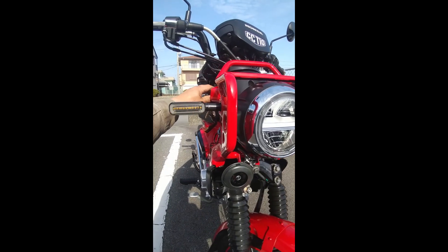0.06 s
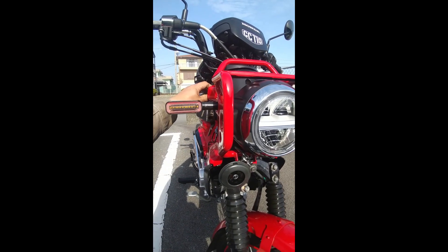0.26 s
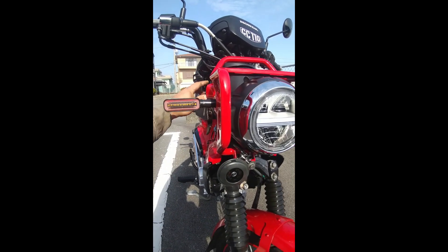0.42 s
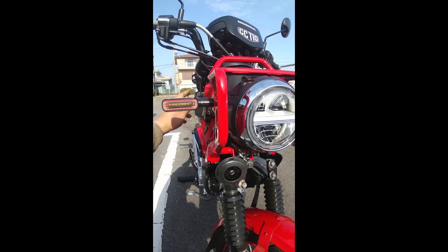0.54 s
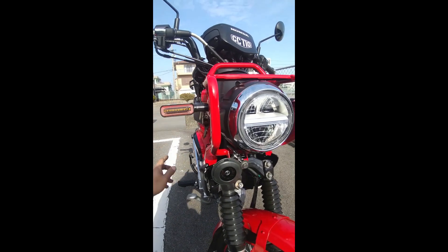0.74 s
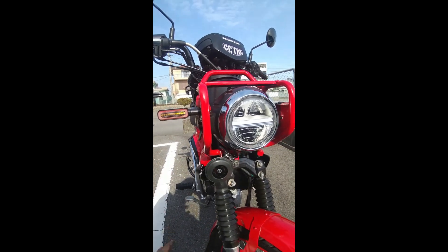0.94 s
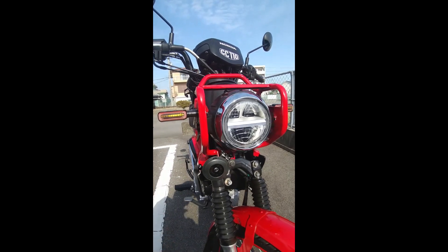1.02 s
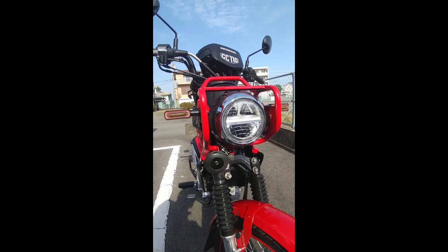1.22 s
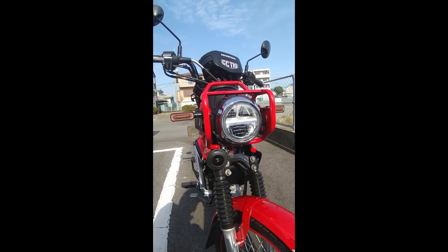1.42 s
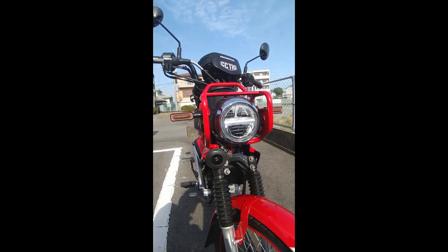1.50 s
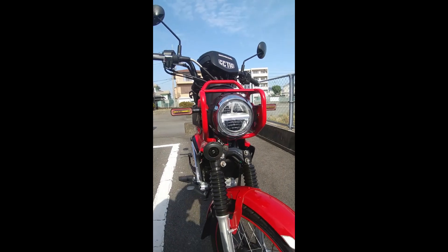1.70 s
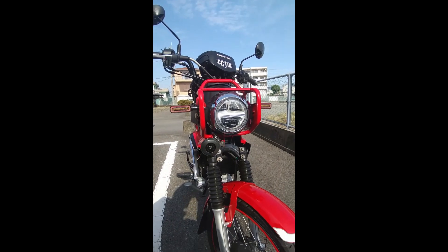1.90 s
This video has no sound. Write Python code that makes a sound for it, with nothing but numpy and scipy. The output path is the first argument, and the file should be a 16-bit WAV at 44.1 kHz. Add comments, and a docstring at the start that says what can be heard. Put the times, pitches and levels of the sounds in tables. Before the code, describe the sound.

A parked motorcycle's ignition key turns with a sharp double click and a tiny jingle. Weaker clicks follow, then a faint pump whir, a quick run of ticks and a brief scuff, close by outdoors over low town rumble.

```python
"""Switching on a parked motorcycle

A hand turns the key, close by outdoors. The lock snaps over its detent and hits its stop, each impact
exciting damped modes; a small steel part jingles and light latches tick. Then something like a fuel pump
whirs faintly, an actuator steps for a third of a second, and there is a brief scuff, over a town's rumble."""
import sys
import numpy as np
from scipy import signal
from scipy.fft import rfft, irfft
from scipy.io import wavfile

SR = 44100
rng = np.random.default_rng(int(sys.argv[2]) if len(sys.argv) > 2 else 0)


def put_to_file(sound):
    """Save the sound as 16-bit audio at rate SR, in the file named by the first command-line argument."""
    columns = np.atleast_2d(sound).T  # one column per channel
    safe = np.clip(columns, -1, 1)
    whole_steps = np.round(safe * 32767)
    wavfile.write(sys.argv[1], SR, whole_steps.astype(np.int16))


N = 85995
T = np.arange(N) / SR
HZ = np.fft.rfftfreq(N, 1 / SR) + 1e-3


def undb(db):
    return 10 ** (np.asarray(db) / 20)


def shaped_noise(gain):
    """Random-phase synthesis: noise of rms 1 with the given magnitude spectrum."""
    x = irfft(gain * np.exp(2j * np.pi * rng.random(len(HZ))), N)
    return x / x.std()


def noise(colour):
    """Spectral shaping: noise follows (Hz, dB) points and rolls off beyond them."""
    hz, db = np.array(colour, float).T
    gain = undb(np.interp(np.log(HZ), np.log(hz), db))
    return shaped_noise(gain * np.minimum(HZ / hz[0], 1) ** 2 * np.minimum(hz[-1] / HZ, 1) ** 3)


def resonant_noise(peaks):
    """Resonance: noise gathers in peaks given as (Hz, width in Hz, dB)."""
    return shaped_noise(sum(undb(db) / (1 + (2 * (HZ - hz) / width) ** 2) for hz, width, db in peaks))


def drift(rate_hz):
    """Low-passed noise: a slow random fluctuation of rms 1."""
    return shaped_noise(1 / (1 + (HZ / rate_hz) ** 4) * (HZ > .1))


def burst(start, attack, hold, t60):
    """Exponential decay, 60 dB in t60, after a linear rise and a hold; times in seconds."""
    age = T - start
    return np.clip(age / attack, 0, 1) * np.exp(-np.log(1000) * np.maximum(age - attack - hold, 0) / t60)


def ring(start, modes, attack=.00062, hold=0):
    """Modal superposition: a struck part sounds as damped sinusoids, of rms 1 before they decay."""
    partials = sum(undb(db) * burst(start, attack, hold, t60) * np.sin(2 * np.pi * (hz * T + rng.random()))
                   for hz, db, t60 in modes)
    return partials / np.sqrt(sum(undb(db) ** 2 for _, db, _ in modes) / 2)


# Spectra of the rumble and the hiss. Each row: frequency in Hz, relative level in dB.
RUMBLE_COLOUR = [(25, -20), (36, -20), (48, 0), (100, -2.5), (200, -8), (260, -13.5), (400, -17.5),
                 (500, -16.5)]
HISS_COLOUR = [(100, 6), (400, -0.5), (1000, -4), (2000, -12.5), (5000, -16), (9000, -24), (11000, -18.5),
               (14000, -15.5)]
# A distant engine's hum. Each row: frequency in Hz, width in Hz, level in dB.
ENGINE_BANDS = [(64.7, 4.7, -61.5), (90.8, 14, -55.5)]

def town():
    """Incoherent noises add: a narrow-band hum, a hiss that rises at first and a swelling rumble."""
    hum = sum(undb(db) * resonant_noise([(hz, width, 0)]) for hz, width, db in ENGINE_BANDS)
    hiss = noise(HISS_COLOUR) * undb(np.interp(T, [0, .35], [-59.5, -57]))
    rumble = noise(RUMBLE_COLOUR) * undb(-50 + .73 * drift(rate_hz=1.8))
    return hum + hiss + rumble


# The whir's envelope. Each row: time in seconds, level in dB.
WHIR_LEVEL = [(.53, -62.5), (.58, -59.5), (.7, -57), (.85, -57), (1.2, -59), (1.3, -62), (1.95, -62)]
# Its spectrum. Each row: frequency in Hz, relative level in dB.
WHIR_COLOUR = [(500, -33), (1000, 2), (2200, 4), (4000, -3), (6500, -1), (7800, -6.5), (9000, -4),
               (10000, -13.5), (14000, -20)]
# The whine's tones. Each row: frequency at full speed in Hz, full level in dB.
WHINE_TONES = [(988, -68), (6950, -82), (9250, -77.5)]

def pump(start=.55, spin_up_s=.05, swell_s=.6, waver=.003):
    """Rotor tones scale with speed: a faint whine spins up and settles within a broadband whir."""
    age = np.maximum(T - start, 0)
    speed = (1 - np.exp(-age / spin_up_s)) * (1 + waver * drift(rate_hz=34))
    rotor_time = np.cumsum(speed) / SR
    whine = sum(undb(db) * np.sqrt(2) * np.sin(2 * np.pi * hz * rotor_time) for hz, db in WHINE_TONES)
    whir = noise(WHIR_COLOUR) * undb(np.interp(T, *np.array(WHIR_LEVEL).T))
    return whine * np.minimum(age / swell_s, 1) + whir


# The scrape's resonances. Each row: frequency in Hz, width in Hz, relative level in dB.
SCUFF_PEAKS = [(1900, 660, -1), (3490, 320, 1), (4300, 400, -2.5), (5140, 450, 1), (7400, 1200, -9)]

def scuff():
    """Sliding friction excites broad resonances: a brief scrape, perhaps a shoe on asphalt."""
    return undb(-46.5) * resonant_noise(SCUFF_PEAKS) * burst(1.158, attack=.0034, hold=.0078, t60=.12)


# Modes of a step and of the case. Each row: frequency in Hz, relative level in dB, t60 in seconds.
PING_MODES = [(6000, -0.5, 0.038), (6290, 1, 0.027), (6730, -3, 0.015), (9050, -13, 0.046)]
CASE_MODES = [(2097, -0.5, 0.11), (2585, 0.5, 0.05), (4570, 0.5, 0.049), (5300, -8, .03),
              (5560, -1.5, 0.058)]
# The case's rasp. Each row: frequency in Hz, relative level in dB.
CASE_COLOUR = [(600, -22), (1500, -15), (2150, -13), (3100, -1.5), (4550, -1), (5600, -2), (7500, -6),
               (10000, -18), (14000, -10)]

def actuator(start=.87, period_s=.02018, steps=18, scatter_db=.6, case_lag_s=.0013):
    """Convolution with an impulse train: each step is a bright ping, then the case's ring and rasp."""
    pulses = np.zeros(N)
    starts = start + period_s * np.arange(steps)
    pulses[(starts * SR).astype(int)] = undb(scatter_db * rng.standard_normal(steps))
    repeat = lambda one_step: signal.fftconvolve(pulses, one_step)[:N]
    ping = undb(-46.5) * ring(0, PING_MODES, attack=.00077)
    case_ring = undb(-53.5) * ring(case_lag_s, CASE_MODES)
    rasp_envelope = undb(-53.5) * burst(case_lag_s, attack=.00077, hold=.0014, t60=.024)
    return repeat(ping + case_ring) + noise(CASE_COLOUR) * repeat(rasp_envelope)


# Modes of the latch and relay. Each row: frequency in Hz, relative level in dB, t60 in seconds.
LATCH_MODES = [(5070, -8.5, 0.19), (5660, 3, 0.028), (8936, -11, 0.28), (10700, -3, .025),
               (12550, -22, 0.11)]
RELAY_MODES = [(899, -8, 0.048), (1800, -7, 0.032), (1990, 1, 0.061), (2110, -4, 0.064), (5900, -15, .04),
               (7235, -10, .04), (8580, -14, 0.052)]
# The relay's rasp. Each row: frequency in Hz, relative level in dB.
RELAY_COLOUR = [(700, -17), (2000, 3.5), (3000, -19), (4300, -5), (5000, -15), (5900, 0), (7800, -7),
                (8700, -1), (9600, -12), (14000, -19)]

def switches(latch_s=.496, relay_s=.53):
    """Free vibration after closing: a thin latch ping, then a lower, rasping relay clack."""
    rasp = undb(-44.5) * noise(RELAY_COLOUR) * burst(relay_s, attack=.0016, hold=.0018, t60=.054)
    ping = undb(-42) * ring(latch_s, LATCH_MODES)
    clack = undb(-42) * ring(relay_s, RELAY_MODES, attack=.0078)
    return ping + clack + rasp


# The lock's light ticks. Each row: start in seconds, level in dB, t60 in seconds.
LOCK_TICKS = [(.318, -56, .03), (.377, -41, 0.035), (0.385, -47.5, .035), (.496, -43, 0.0088)]
# Spectrum of the ticks and the key's slip. Each row: frequency in Hz, relative level in dB.
CONTACT_COLOUR = [(500, -11), (2500, -5), (4200, -7.5), (5700, -2), (7500, -7), (8700, -7), (10000, -9.5),
                  (14000, -11)]

def ticks():
    """A brief contact has a broad spectrum: the lock ticks in short bursts of noise."""
    envelope = sum(undb(db) * burst(start, .0005, 0, t60) for start, db, t60 in LOCK_TICKS)
    return noise(CONTACT_COLOUR) * envelope


# Touches of the steel part. Each row: start in seconds, level in dB, hold and t60 in seconds.
TOUCHES = [(0.234, -32, .004, 0.11), (0.248, -30.5, .003, 0.016), (.378, -52, 0.0092, 0.06),
           (0.42, -51, .002, .035)]
# Its modes. Each row: frequency in Hz, relative level in dB, fraction of the touch's t60.
STEEL_MODES = [(12877, 0, 1), (12946, -7, .8), (11120, -17, .7), (13150, -14, .6)]

def jingle():
    """A small, stiff body has high modes: a steel part, perhaps the key ring, rings at each touch."""
    out = np.zeros(N)
    for start, level_db, hold, t60 in TOUCHES:
        modes = [(hz, db, t60 * fraction) for hz, db, fraction in STEEL_MODES]
        out += undb(level_db) * ring(start, modes, attack=.001, hold=hold)
    return out


# The key's grinding. Each row: frequency in Hz, relative level in dB.
GRIND_COLOUR = [(600, -12), (3000, -12.5), (5700, -4), (7500, -5), (10000, -9), (12000, -5), (13300, 5),
                (14200, -2)]

def key_friction(detent_s, stop_s, slip_s=.003):
    """Friction noise: the key slips just before the first snap and grinds on until the second."""
    slip = undb(-24) * noise(CONTACT_COLOUR) * burst(detent_s - slip_s, slip_s, 0, .01) ** 2
    grind_envelope = undb(-37.5) * burst(detent_s, attack=.0017, hold=stop_s - detent_s, t60=.016)
    return slip + noise(GRIND_COLOUR) * grind_envelope


# The bodywork's rattle. Each row: frequency in Hz, relative level in dB.
BODY_COLOUR = [(200, -24.5), (330, -6), (480, -0.5), (800, -1.5), (1250, -3.5), (1600, -8), (1890, -1),
               (2320, -5.5), (3620, -3.5), (5740, -10), (7690, -10), (8500, -4), (11500, -22), (14000, -21)]
# Its modes. Each row: frequency in Hz, relative level in dB, t60 in seconds.
BODY_MODES = [(533.7, -8, 0.13), (900, -12.5, 0.21), (1482, -0.5, 0.038), (1790, 7, 0.033),
              (3180, 2, 0.076), (4030, -14.5, 0.36), (6360, -9, 0.083), (6730, 8, .07), (10170, -7, 0.083),
              (12900, -18, 0.45)]

def bodywork(start, rattle_db, rattle_t60, attack=.0084):
    """Structure-borne sound: a snap shakes the bodywork, and reverberation fades in the yard."""
    rattle = undb(rattle_db) * noise(BODY_COLOUR) * burst(start, attack, 0, rattle_t60)
    ringing = undb(rattle_db - 4.5) * ring(start, BODY_MODES, attack)
    yard = undb(-55.5) * noise(BODY_COLOUR) * burst(start, attack=.013, hold=0, t60=.74)
    return rattle + ringing + yard


# Modes of the detent and stop. Each row: frequency in Hz, relative level in dB, t60 in seconds.
DETENT_MODES = [(2700, 1, 0.052), (2690, -11, 0.04), (3143, -10, 0.064), (3502, 0.5, 0.098),
                (3663, 0, 0.05), (3990, 6, 0.054), (4300, 1, 0.063), (4510, -5, .06), (6520, -8, .07),
                (7430, -4, 0.058), (7562, 8, 0.031), (7750, -13, 0.039)]
STOP_MODES = [(1486, -5, 0.049), (2653, 2, 0.062), (3273, 0.5, 0.049), (4608, -1, 0.05), (4970, -9, 0.059),
              (6320, -1, 0.063), (7050, -14, 0.069), (7530, -17, 0.05), (8947, -8, 0.066),
              (9350, -6, 0.027), (10100, -6.5, 0.085), (10780, -25, 0.072)]
# Spectra of their cracks. Each row: frequency in Hz, relative level in dB.
DETENT_CRACK = [(300, -23), (765, -18), (2200, -20), (2600, -6), (3700, 1), (4600, -3), (5400, -10),
                (7000, -6.5), (7600, 2), (8300, -9), (9600, -23), (11000, -26.5), (13100, -14),
                (14200, -26)]
STOP_CRACK = [(180, -47), (300, -11), (1680, -18.5), (2130, -29), (2630, 2), (2940, 3), (4190, -9),
              (4840, -6), (5510, -22), (5970, -9), (7480, -0.5), (9990, -23), (14000, -15)]

def lock_snaps(detent_s, stop_s, attack=.00037):
    """Impact excitation: each of two hard blows cracks, shakes the bodywork and rings the struck part."""
    detent = undb(-13.5) * noise(DETENT_CRACK) * burst(detent_s, attack, hold=.0029, t60=.017)
    detent += bodywork(detent_s, rattle_db=-26, rattle_t60=.086)
    detent += undb(-15.5) * ring(detent_s, DETENT_MODES, attack)
    stop = undb(-19.5) * noise(STOP_CRACK) * burst(stop_s, attack, hold=.0041, t60=.014)
    stop += bodywork(stop_s, rattle_db=-30, rattle_t60=.073)
    stop += undb(-23.5) * ring(stop_s, STOP_MODES, attack)
    return detent + stop


def scene(detent_s=.2205, stop_s=.2726, treble_hz=7600):
    """Mid-side stereo: all is central; only the treble's phase and a faint hiss differ between the ears."""
    lock = lock_snaps(detent_s, stop_s) + key_friction(detent_s, stop_s) + jingle() + ticks()
    mid = lock + switches() + actuator() + scuff() + pump() + town()
    treble = 1 / (1 + (treble_hz / HZ) ** 8)
    quadrature = irfft(1j * rfft(mid) * treble, N)
    side = undb(-13) * quadrature + undb(-67) * shaped_noise(treble)
    return np.array([mid + side, mid - side])


def record(dry):
    """Band limiting: an elliptic low-pass cuts steeply above 14250 Hz."""
    return signal.sosfilt(signal.ellip(10, .2, 70, 14250, fs=SR, output="sos"), dry)


dry = scene()
out = record(dry)
put_to_file(out)
```